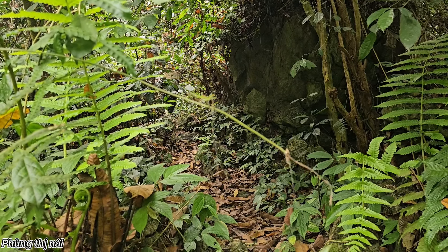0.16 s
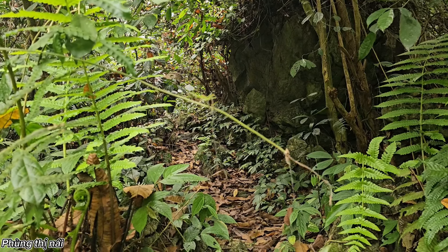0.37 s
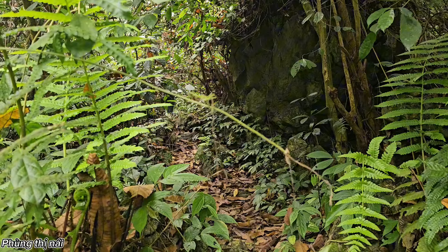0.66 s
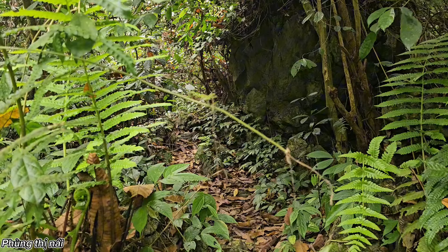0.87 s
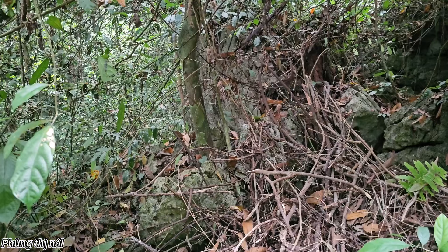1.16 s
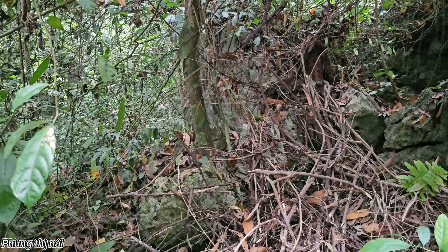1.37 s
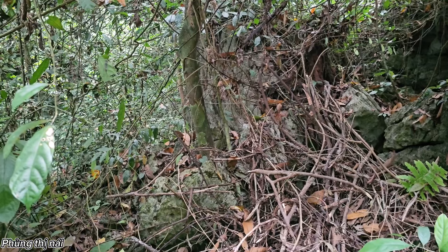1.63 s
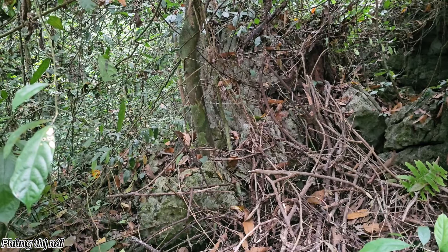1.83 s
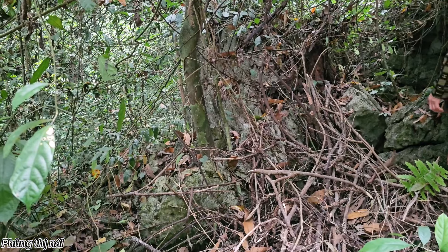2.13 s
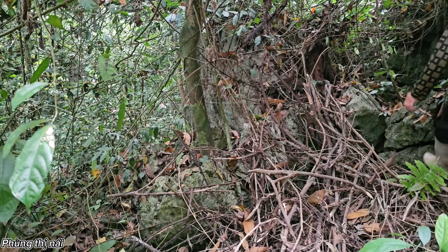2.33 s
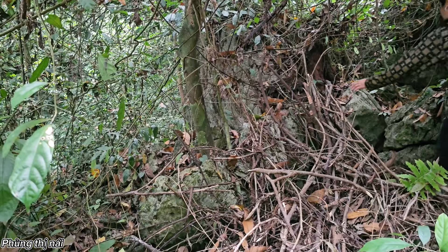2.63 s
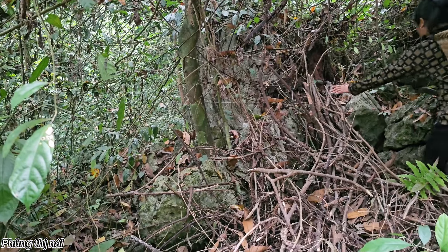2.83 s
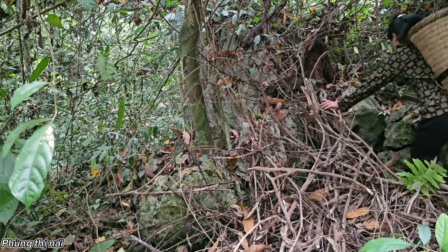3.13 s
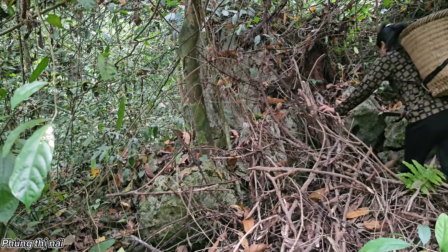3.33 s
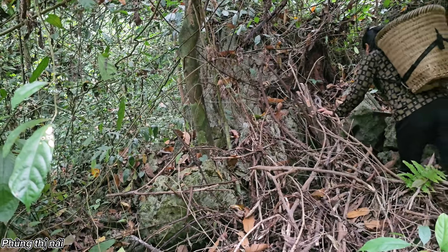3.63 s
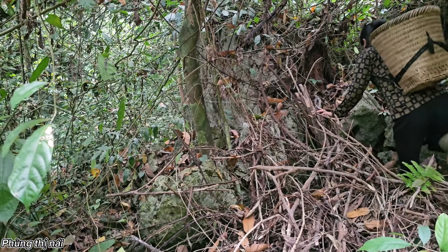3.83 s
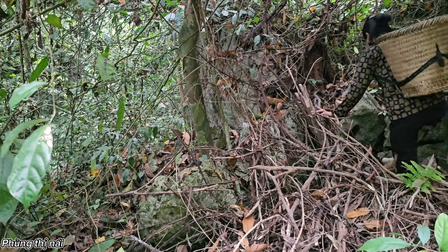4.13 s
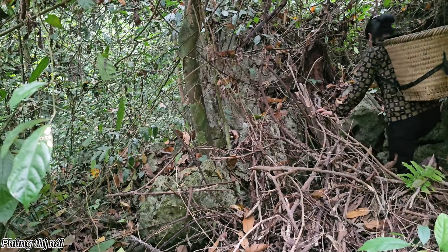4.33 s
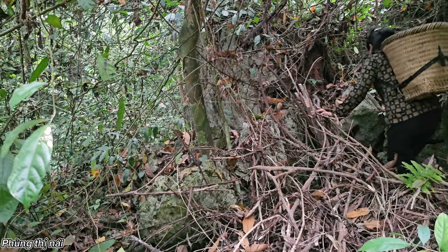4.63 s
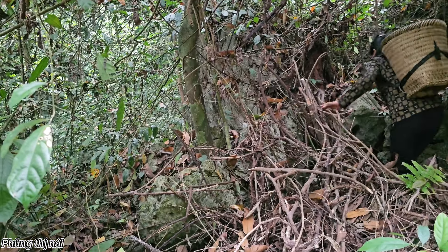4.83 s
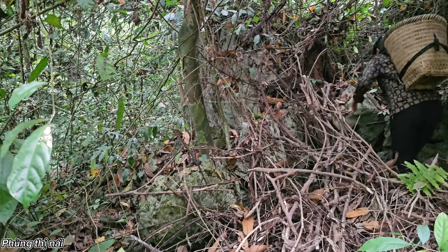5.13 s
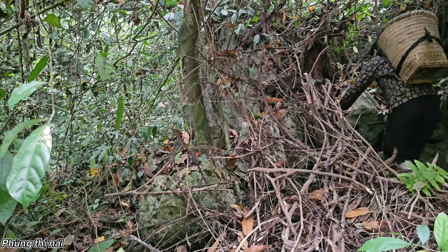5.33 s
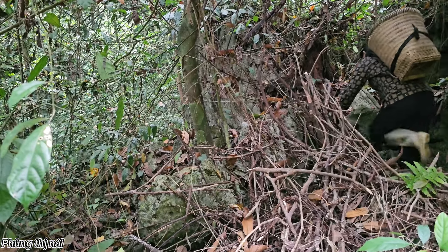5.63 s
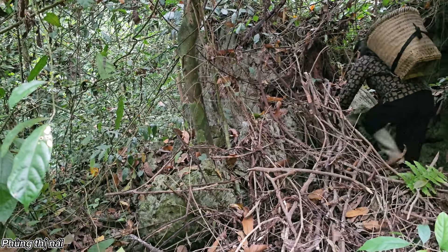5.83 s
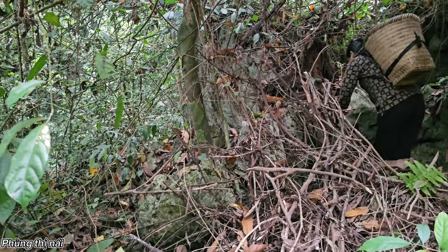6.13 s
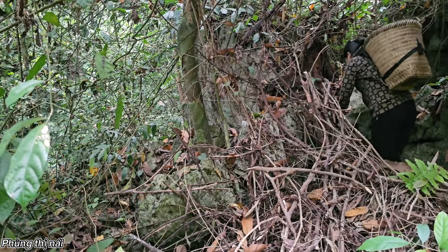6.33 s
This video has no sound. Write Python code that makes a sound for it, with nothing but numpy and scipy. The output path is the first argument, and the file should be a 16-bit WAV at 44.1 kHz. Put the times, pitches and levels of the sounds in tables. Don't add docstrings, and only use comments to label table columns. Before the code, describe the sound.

Outdoors in forest: first a continuous buzzing insect bed, ended by a tiny silence. Then sparse close crackles of dry wood and leaves over very dark gaps, strongest in a cluster around three seconds. Faint cicada pulses and a fly's hum come and go. After five seconds one overloaded hollow wooden thud, then scattered small snaps. Background opens only around nearby sounds.

```python
import sys
import numpy as np
from scipy import signal
from scipy.fft import rfft, irfft, next_fast_len
from scipy.io import wavfile
from scipy.ndimage import uniform_filter1d

SR = 44100
rng = np.random.default_rng(int(sys.argv[2]) if len(sys.argv) > 2 else 0)


def attenuation_scalar(level_db):
    decades = np.asarray(level_db, float) / 20
    return 10 ** decades


def dump(signal):
    limited = np.clip(np.atleast_2d(signal).T, -1, 1)
    pcm = np.round(limited * 32767).astype(np.int16)
    wavfile.write(sys.argv[1], SR, pcm)


N = 286341

# start_s, end_s
CUT_S = (1.069, 1.111)


def rms_one(x):
    return x / np.sqrt(np.mean(x ** 2) + 1e-20)


def in_time(rows):
    s, *columns = np.transpose(rows)
    return [np.interp(np.arange(N) / SR, s, c) for c in columns]


def drift(rate_hz):
    r = np.exp(-80 * np.pi * rate_hz / SR)
    white = rng.standard_normal(N // 40 + 2002)
    slow = signal.lfilter([1], [1, -2 * r, r * r], white)[2000:]
    return np.interp(np.arange(N) / 40, np.arange(len(slow)), rms_one(slow))


def coloured(x, spectrum):
    size = next_fast_len(N)
    hz = np.fft.rfftfreq(size, 1 / SR) + 1
    point_hz, point_db = np.transpose(spectrum)
    gain = attenuation_scalar(np.interp(np.log(hz), np.log(point_hz), point_db))
    return rms_one(irfft(rfft(x, size) * gain, size)[:N])


def resonate(x, hz, width_hz):
    r = np.exp(-np.pi * width_hz / SR)
    return signal.lfilter([(1 - r * r) / 2, 0, (r * r - 1) / 2], [1, -2 * r * np.cos(2 * np.pi * hz / SR), r * r], x)


def burst(rise_s, t60, closing):
    rise_s, t60 = np.clip(rise_s, 0.0004, 0.05), np.clip(t60, 0.01, 0.4)
    t = np.arange(int((rise_s + t60) * SR)) / SR
    rise = np.sin(np.pi / 2 * np.minimum(t / rise_s, 1)) ** 2
    fall = np.maximum(t - rise_s, 0) / t60
    return t, rise * attenuation_scalar(-60 * ((2 - closing) * fall + closing * fall ** 2))


def add(out, s, x):
    i = round(s * SR)
    out[i:i + len(x)] += x[:N - i]


def chorus(modes, throb_db, wander_db, together):
    white = rng.standard_normal((2, N))
    out = np.zeros(N)
    for k, (hz, width_hz, db) in enumerate(modes):
        band = rms_one(resonate(resonate(white[k % 2], hz, width_hz), hz, 0.88 * width_hz))
        throb = throb_db * (0.85 * together + drift(44))
        out += attenuation_scalar(db + throb + wander_db * drift(6.3)) * band
    return rms_one(out)


def path():
    # time_s, level_db
    path_level = [(0.0, -50), (0.206, -54.5), (0.216, -51), (0.352, -49.5), (0.36, -50.5), (0.514, -50.5),
                  (0.894, -55), (0.988, -52), (1.065, -54)]
    # pitch_hz, width_hz, level_db
    drone_modes = [(450, 130, -0.5), (819, 79, 6.5), (1400, 210, 3.5), (1680, 73, 8.5), (2520, 70, 8.5),
                   (2860, 220, 3.5), (3387, 95, 3.5), (4470, 460, 4.5), (6270, 98, 3.5), (13800, 500, -6),
                   (14600, 400, -4)]
    # freq_hz, level_db (per Hz)
    hiss_spectrum = [(30, -15.5), (300, -16), (800, -12.5), (3000, -12.5), (4200, -14), (5400, -20.5),
                     (6500, -10), (8500, -6.5), (11000, -16), (16000, -21)]
    level_db, = in_time(path_level)
    throb = drift(36)
    hiss = coloured(rng.standard_normal(N), hiss_spectrum) * attenuation_scalar(1.5 * throb)
    drone = chorus(drone_modes, throb_db=1.9, wander_db=0.8, together=throb)
    return attenuation_scalar(level_db - 4.5) * drone + attenuation_scalar(level_db - 3.5) * hiss


def gate_opening(near):
    shut_db, span_db, release_db_per_s, smooth_s = -62, 29.5, 127.5, 0.067
    sink = release_db_per_s * np.arange(N) / SR
    level_db = 10 * np.log10(np.abs(uniform_filter1d(near ** 2, size=800)) + 1e-12)
    held_db = np.maximum.accumulate(level_db + sink) - sink
    return uniform_filter1d(np.clip((held_db - shut_db) / span_db, 0, 1), int(smooth_s * SR))


def swells(air_share):
    # start_s, length_s, first_db, last_db, air_db (air let through)
    swell_events = [
        (1.8, 0.17, -96, -96, 13),
        (2.15, 0.24, -76, -71.5, 6),
        (3.883, 0.25, -72, -63.5, -14.5),
        (4.226, .24, -63.5, -72.5, -14),
        (4.538, 0.16, -68.5, -58, -25),
        (4.812, 0.52, -73, -70, -11),
        (5.722, 0.27, -73.5, -67, -18),
        (6.151, 0.099, -60.5, -77, -4.5),
        (6.307, .2, -75, -76, -17),
    ]
    rise_db_per_s, fall_db_per_s = 198, 222
    t = np.arange(N) / SR
    levels = []
    for s, length, first_db, last_db, air_db in swell_events:
        hold_db = np.interp(t, [s, s + length], [first_db, last_db])
        before_db = rise_db_per_s * np.maximum(s - t, 0)
        after_db = fall_db_per_s * np.maximum(t - s - length, 0)
        levels.append(hold_db - before_db - after_db + air_share * air_db)
    return np.max(levels, axis=0)


def pulses():
    # start_s, peak_db
    flares = [(2.108, -56.5), (2.1655, -54.5), (2.2822, -51), (2.3594, -57), (2.7194, -57.5),
              (3.4555, -46.5), (3.7394, -57.5), (4.0294, -53.5), (4.0894, -55), (4.5545, -55.5),
              (4.638, -49), (4.788, -60), (4.8397, -55.5), (4.9094, -60), (5.006, -53), (5.0419, -65),
              (5.0774, -65), (5.1347, -55), (5.1926, -56.5), (5.4824, -60), (5.6121, -55), (5.7843, -56.5),
              (5.8092, -52.5), (5.9356, -52), (6.0194, -58), (6.412, -47)]
    out = np.zeros(N)
    for s, db in flares:
        add(out, s - 0.004, attenuation_scalar(db - 10) * burst(0.008, t60=0.078, closing=1.2)[1])
    return out


def cicadas(opening):
    # pitch_hz, width_hz, level_db
    cicada_modes = [(4500, 800, -6), (4280, 2300, -7), (7200, 1100, -6.5), (7950, 780, 1), (8760, 1600, 2),
                    (10000, 2000, -2.5), (11100, 1100, -4.5), (13000, 2500, -11.5)]
    t = np.arange(N) / SR
    singing = np.hypot(attenuation_scalar(swells(0)), pulses())
    settling_db = 52 * np.exp(-np.abs(t - CUT_S[1]) / 0.036)
    resting = attenuation_scalar(-86.5 + np.maximum(12 * opening, settling_db))
    song = chorus(cicada_modes, throb_db=1.2, wander_db=1.2, together=1.8 * drift(25))
    return np.hypot(singing, resting) * song


def thicket_air(opening):
    # freq_hz, level_db (per Hz)
    air_spectrum = [(350, -47.5), (600, -27.5), (698, -16.5), (1070, -6.5), (1140, -8.5), (1350, -8.5),
                    (2370, -13), (3340, -11), (16000, -21)]
    # freq_hz, level_db (per Hz)
    low_spectrum = [(12, -31.5), (20, 8), (108, -19.5), (225, -15.5), (320, -23.5), (447, -21),
                    (558, -19.5), (900, -25.5), (1170, -47.5), (1980, -120)]
    t = np.arange(N) / SR
    air = coloured(rng.standard_normal(N), air_spectrum) * attenuation_scalar(0.96 * drift(20))
    low = coloured(rng.standard_normal(N), low_spectrum) * attenuation_scalar(0.46 * drift(14))
    air_gain = np.hypot(attenuation_scalar(swells(1) - 5.5), attenuation_scalar(-80 + 4 * opening))
    settling_db = 8.5 * np.exp(-np.abs(t - CUT_S[1]) / 0.83)
    return air_gain * air + attenuation_scalar(-77 + 12.5 * opening + settling_db) * low


def far_insects():
    # pitch_hz, width_hz, level_db
    far_modes = [(438.5, 80, -2.5), (1320, 135, 1.5), (1700, 110, -2.5), (2710, 250, -3.5),
                 (4500, 600, 4.5), (5460, 300, -6), (6260, 900, -5)]
    return attenuation_scalar(swells(1) - 3) * chorus(far_modes, throb_db=4, wander_db=1.5, together=drift(20))


def thicket(opening):
    # centre_s, depth_db, half_width_s
    ducks = [
        (2.57, 5, .06),
        (2.77, 6, 0.063),
        (3.56, 0, 0.052),
        (6.341, 1, 0.059),
    ]
    t = np.arange(N) / SR
    duck_db = sum(db * np.maximum(1 - np.abs(t - s) / half_s, 0) for s, db, half_s in ducks)
    return attenuation_scalar(-duck_db) * (cicadas(opening) + thicket_air(opening) + far_insects())


def whistles(calls, partials, wobble, flutter_db):
    out, shake, flutter = np.zeros(N), drift(110), drift(45)
    for rows in calls:
        hz, db = in_time(rows)
        start, end = rows[0][0], rows[-1][0]
        fade = np.interp(np.arange(N) / SR, [start - 0.01, start + 0.006, end - 0.01, end + 0.018], [0, 1, 1, 0])
        phase = 2 * np.pi * np.cumsum(hz * (1 + wobble * shake)) / SR
        tone = sum(attenuation_scalar(partial_db) * np.sin(k * phase) for k, partial_db in partials)
        out += np.sqrt(2) * fade * attenuation_scalar(db + flutter_db * flutter) * tone
    return out


def fly():
    # time_s, pitch_hz, level_db
    fly_passes = [
        [(2.14, 465, -82), (2.2, 452, -82), (2.35, 405, -87)],
        [(3.72, 460, -84), (3.82, 450, -90)],
        [(4.0, 440, -84), (4.12, 450, -86)],
        [(4.27, 420, -85), (4.35, 430, -86)],
        [(4.66, 433, -86), (4.98, 428, -86), (5.03, 445, -81), (5.17, 445, -86)],
    ]
    return whistles(fly_passes, [(0.5, -10), (1, 0)], wobble=0.014, flutter_db=2.5)


def echoes(x, taps):
    out = x.copy()
    for s, db in taps:
        add(out, s, attenuation_scalar(db) * x)
    return out


def bird():
    # time_s, pitch_hz, level_db
    bird_calls = [
        [(2.81, 2560, -98), (2.86, 2470, -62), (2.92, 2340, -68.5), (2.97, 2130, -52.5), (2.99, 2070, -76)],
        [(3.125, 2680, -74), (3.165, 2755, -60.5), (3.2, 2857, -42.5), (3.235, 2860, -65.5), (3.3, 2860, -67),
         (3.312, 2760, -74.5), (3.335, 2790, -60), (3.37, 2720, -69), (3.42, 2730, -72)],
    ]
    calls = whistles(bird_calls, [(1, 0)], wobble=0.009, flutter_db=5)
    return echoes(calls, [(0.017, -9), (0.036, -16), (0.058, -21), (0.09, -25)])


def leaves():
    # start_s, peak_db, low_band_db, top_band_db, t60_s
    crushed = [(1.434, -63, 5, -11, 0.04), (1.4444, -66.5, 4.5, -3, 0.14), (2.3837, -64.5, 3, -16, 0.044),
               (2.4557, -65, 11, -25, 0.04), (2.5007, -68.5, 4, -18, 0.081), (2.582, -62.5, 4.5, -3, 0.077),
               (2.663, -60, 3, -1, 0.1), (2.9621, -43, 1.5, -11, 0.056), (2.9824, -53, 4, -34, 0.038),
               (3.052, -46, 4, -2.5, 0.12), (3.1727, -54, 2.5, -8.5, 0.21), (3.195, -58, 0, -6, 0.18),
               (3.2904, -62, 1.5, -3, 0.49), (3.3228, -55.5, 2.5, -14, 0.1), (3.3665, -65, 2.5, -2.5, 0.26),
               (3.4075, -63.5, 3.5, -8.5, 0.05), (3.476, -66.5, 3.5, 6, 0.095),
               (5.356, -52.5, 3.5, -4.5, 0.16), (6.4088, -62.5, 6, 0, 0.16)]
    scuffed = [(1.391, -67, -6, -9, 0.32), (1.9514, -62.5, -4, -8, 0.05), (2.8485, -59, -7, -12, 0.19),
               (2.9454, -51.5, -7.5, -23, 0.31), (4.2217, -51, -2.5, -16, 0.041),
               (4.4544, -71, -13, -3, 0.066), (5.2195, -63.5, -7, -11, 0.23),
               (5.3098, -58.5, -7.5, -13, 0.24), (5.5474, -68, -4, -9, 0.07), (5.6371, -61, -9, -13, 0.032),
               (5.6925, -67, -6, -5.5, 0.045), (5.9098, -62.5, -6.5, -12.5, 0.06),
               (6.1135, -57, -6.5, -22, 0.19), (6.2973, -53.5, -8, -11, 0.082),
               (6.4182, -51, -8.5, -11, 0.14), (6.44, -56, -15, -10, 0.11)]
    brushed = [(1.112, -37, -18, -13, .018), (2.628, -61, -19, -12, .03), (2.6373, -23.5, -23, -14, 0.091),
               (3.67, -49.5, -14, -7, 0.045), (3.6828, -34.5, -22, -5.5, 0.062),
               (3.695, -25.5, -24.5, -9.5, 0.07), (3.71, -41, -19, -12, 0.045),
               (3.722, -53, -16, -20, 0.078), (4.253, -62, -11, -25, 0.052), (4.3839, -48, -16, -11, 0.084),
               (4.428, -40.5, -19, -5.5, 0.13), (4.436, -41.5, -18, -6.5, 0.05),
               (4.7135, -44.5, -21, -4.5, 0.12), (6.1305, -42.5, -15, 1, 0.061), (6.143, -45, -23, 10, .07),
               (6.149, -41, -22, 9, 0.057), (6.16, -50.5, -20.5, 2, 0.11), (6.175, -55.5, -20.5, 1, 0.13)]
    cracks = rng.standard_normal(N) * attenuation_scalar(2.4 * drift(210))
    bands = []
    for edges_hz in ((1800, 4600), (3900, 7440), (10200, 20800)):
        band_pass = signal.butter(3, edges_hz, "band", fs=SR, output="sos")
        bands.append(rms_one(signal.sosfilt(band_pass, cracks)))
    clumps = np.zeros(N)
    for hz in (2100, 2750, 3300, 3700, 4200, 4800):
        clumps += attenuation_scalar(5 * drift(30)) * resonate(cracks, hz, 400)
    bands[0] = rms_one(attenuation_scalar(-4) * bands[0] + rms_one(clumps))
    powers = np.zeros((3, N))
    for rows, quickest_rise_s in ((crushed, 0.0045), (scuffed, 0.0045), (brushed, 0.0037)):
        for s, db, low_db, top_db, t60 in rows:
            rise_s = quickest_rise_s + 0.065 * max(t60 - 0.1, 0)
            t, envelope = burst(1.78 * rise_s, t60, closing=1.145)
            for power, band_db in zip(powers, (low_db + 3.5, -8, top_db + 4.5)):
                add(power, s - 0.66 * rise_s, (attenuation_scalar(db + band_db) * envelope) ** 2)
    return (np.sqrt(powers) * bands).sum(axis=0)


def rubbing(fibres, s, size, hz, upper_db):
    noise = fibres[round(s * SR) - 4096:][:size + 4096]
    main = resonate(noise, hz, 0.45 * hz)
    lower = None
    noise = main + attenuation_scalar(-5) * resonate(noise, 0.62 * hz, 0.3 * hz) + attenuation_scalar(upper_db) * resonate(noise, 1.7 * hz, 0.5 * hz)
    low_pass = signal.butter(3, 1.8 * hz, fs=SR, output="sos")
    return rms_one(signal.sosfilt(low_pass, noise)[4096:])


def knocks(rows, rise_cycles, sag, rough):
    out, fibres = np.zeros(N), rng.standard_normal(N + SR)
    for s, db, hz, t60 in rows:
        t, envelope = burst(rise_cycles / hz, t60, closing=0.93)
        tone = np.sin(2 * np.pi * hz * (t - sag * t * t))
        crumble = rough * rubbing(fibres, s, len(t), hz, upper_db=-7)
        add(out, s - 0.594 * rise_cycles / hz, attenuation_scalar(db) * envelope * (tone + crumble))
    return out


def footsteps():
    # start_s, peak_db, pitch_hz, t60_s
    thumps = [(1.02, -33.5, 66.6, 0.09), (1.439, -62.5, 80, 0.21), (1.727, -65.5, 129, 0.17),
              (1.945, -60, 56, 0.15), (2.499, -58, 62.4, 0.19), (2.585, -52, 147, 0.12),
              (2.659, -55, 131, 0.067), (3.055, -58, 139, 0.12), (3.178, -20.5, 90, 0.16),
              (3.319, -29, 95, 0.09), (3.366, -42.5, 85, 0.2), (3.694, -65, 55, 0.21),
              (4.209, -54, 59.2, 0.34), (4.714, -68.5, 71, 0.29), (4.909, -69.5, 94, 0.21),
              (5.408, -54, 82.5, 0.3), (5.519, -55, 149.3, 0.05), (6.098, -58, 71.8, 0.11),
              (6.289, -63, 94.2, 0.091), (6.403, -55.5, 142, 0.32)]
    return knocks(thumps, rise_cycles=0.9, sag=1.5, rough=0.2)


def branches():
    # start_s, peak_db, pitch_hz, t60_s
    branch_hits = [(1.021, -52, 191, 0.21), (1.96, -57, 223, 0.1), (2.456, -46, 383, 0.11),
                   (2.511, -54, 386, 0.26), (2.586, -30, 243, 0.07), (2.671, -37, 251, 0.069),
                   (2.965, -51, 280, 0.084), (3.062, -22.5, 297, 0.066), (3.185, -29.5, 192, 0.053),
                   (3.325, -33, 253, 0.12), (3.686, -45, 272, 0.12), (4.199, -34.5, 233, 0.067),
                   (4.221, -42, 253, 0.057), (4.385, -39, 293, 0.11), (4.416, -40.5, 270.2, 0.1),
                   (4.9, -59.5, 249, 0.075), (5.23, -49, 251, 0.1), (5.321, -48, 255, 0.096),
                   (5.399, -46, 253, 0.094), (5.439, -50.5, 277, 0.049), (5.524, -42, 255, 0.057),
                   (5.549, -53, 264, 0.045), (5.889, -59, 276, 0.19), (6.112, -54, 283, 0.054),
                   (6.409, -45.5, 190, 0.063), (5.356, -34.5, 228, 0.051), (5.3821, -21, 243, 0.028),
                   (3.7, -52.5, 328, .06)]
    return knocks(branch_hits, rise_cycles=1.9, sag=1.5, rough=0.25)


def hollow_log():
    # pitch_hz, peak_db, rise_s, t60_s
    log_modes = [
        (185, -5, .0059, .016),
        (256, -1.5, .008, .06),
        (293, -3, .0012, .045),
        (518, -7, .0035, .036),
        (774, -24.5, .007, .025),
    ]
    out = np.zeros(N)
    for hz, db, rise_s, t60 in log_modes:
        t, envelope = burst(rise_s, t60, closing=0.14)
        add(out, 5.366, attenuation_scalar(db) * envelope * np.sin(2 * np.pi * hz * t))
    out = signal.sosfilt(signal.butter(3, 1000, fs=SR, output="sos"), out)
    return 1.1 * out / np.abs(out).max()


def twigs():
    # start_s, peak_db, pitch_hz
    dry_twigs = [(1.112, -50.5, 459), (1.48, -60.5, 724), (1.514, -58, 514), (1.737, -47, 713),
                 (2.409, -46, 530), (2.429, -35, 509), (2.455, -38, 658), (2.513, -42, 532),
                 (2.665, -51, 430), (3.053, -18.5, 560), (3.056, -46, 714), (3.061, -26.5, 547),
                 (3.404, -50.5, 523), (3.687, -46, 460), (4.133, -43.5, 699), (4.141, -40, 635),
                 (4.163, -53, 493), (4.222, -35, 522), (4.254, -49, 740), (4.377, -49, 550),
                 (4.384, -28, 608), (5.149, -66.5, 544), (5.17, -62, 560), (5.2, -65, 600),
                 (5.218, -60, 600), (5.262, -60, 580), (5.281, -69, 600), (5.322, -48, 600),
                 (5.44, -57, 450), (6.07, -65, 600), (2.995, -51, 520), (3.61, -65, 430), (4.39, -40, 750),
                 (5.357, -41, 705), (5.604, -51, 580), (5.691, -65.5, 733), (5.89, -52.5, 577),
                 (5.907, -59, 407), (6.111, -40.5, 553), (6.301, -52.5, 689)]
    green_stems = [(1.445, -55, 550), (1.952, -49, 530), (2.584, -34, 578), (2.983, -41, 506),
                   (3.18, -30, 528), (3.294, -48, 630), (3.323, -24, 530), (3.365, -47, 686),
                   (3.671, -56.5, 733), (4.368, -42, 597), (4.716, -61, 485), (5.23, -46, 513),
                   (5.305, -48, 525), (5.405, -47, 470), (4.13, -56, 450), (6.3, -62, 300),
                   (6.131, -46.5, 582), (6.412, -40.5, 563)]
    splinters = [(1.201, -56.5, 1656), (1.446, -40.5, 3230), (2.456, -31, 2750), (2.849, -61, 1096),
                 (2.962, -29, 956), (2.968, -38.5, 1044), (3.196, -37, 3250), (3.29, -53, 3400),
                 (3.835, -44, 1140), (3.836, -53, 754), (6.4, -62, 1500), (4.219, -34.5, 987),
                 (3.053, -23, 920), (4.385, -34, 750), (5.242, -48.5, 944), (5.639, -51, 1067),
                 (5.833, -60, 1530), (6.116, -42.5, 2150), (2.36, -65, 1400), (2.36, -60, 2600),
                 (2.387, -55.5, 2800), (2.503, -52, 3250), (2.985, -43, 3400), (3.062, -29, 960),
                 (2.458, -38, 3500), (3.18, -46, 3400), (3.21, -44, 3500), (3.3, -52, 3300),
                 (1.115, -58, 1300), (4.224, -46, 2400), (4.143, -54, 1050), (4.388, -56, 1810),
                 (5.638, -53, 1490), (5.605, -55.5, 950)]
    rough = 0.4
    out, fibres = np.zeros(N), rng.standard_normal(N + SR)
    for rows, rise_s, t60 in ((dry_twigs, 0.0051, 0.056), (green_stems, 0.0036, 0.095), (splinters, 0.003, 0.04)):
        for s, db, hz in rows:
            t, envelope = burst(1.6 * rise_s, 0.95 * t60, closing=1.2)
            noise = rubbing(fibres, s, len(t), hz, upper_db=-29)
            if hz > 1300:
                noise = rms_one(resonate(noise, hz, 0.3 * hz))
            ring = np.sin(2 * np.pi * hz * t) * (hz < 1800)
            add(out, s - 0.87 * rise_s, attenuation_scalar(db) * envelope * ((1 - rough) * ring + rough * noise))
    return out


def scene():
    t = np.arange(N) / SR
    on_path, in_thicket = t < CUT_S[0], t > CUT_S[1]
    walker = footsteps() + branches() + hollow_log() + twigs() + leaves()
    animals = bird() + fly()
    ambience = path() * on_path + thicket(gate_opening(walker)) * in_thicket
    return ((walker + animals + ambience) * (on_path | in_thicket))[None]


def band_limit(x):
    return signal.sosfilt(signal.butter(12, 16550, fs=SR, output="sos"), x)


def record(dry):
    x = signal.sosfilt(signal.butter(2, 52, "high", fs=SR, output="sos"), dry)
    x = signal.sosfilt(signal.cheby2(20, 70, 16250, fs=SR, output="sos"), x)
    return band_limit(x)


dry = scene()
out = record(dry)
dump(out)
```